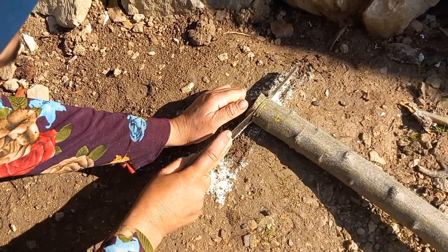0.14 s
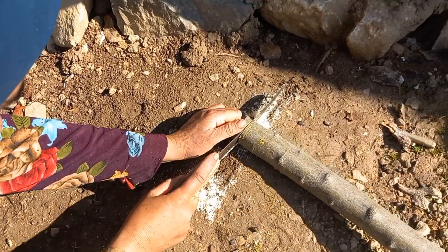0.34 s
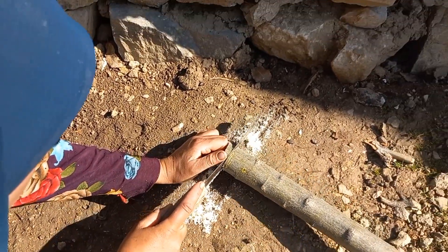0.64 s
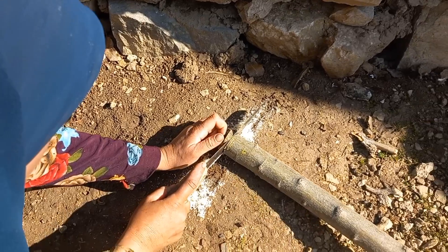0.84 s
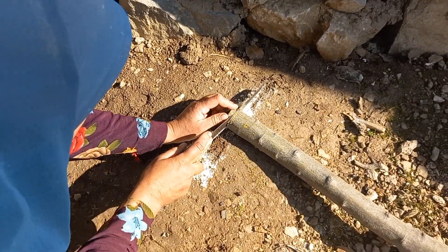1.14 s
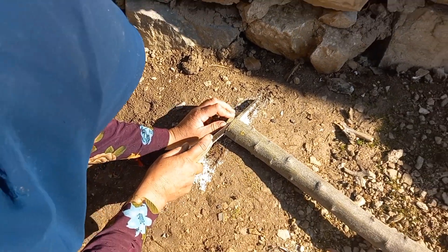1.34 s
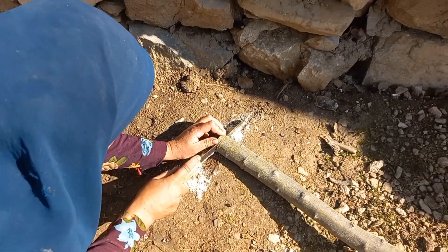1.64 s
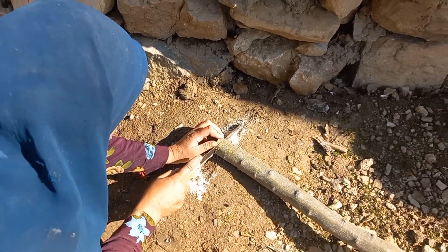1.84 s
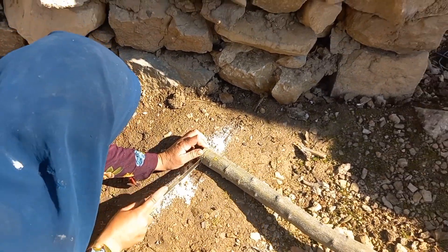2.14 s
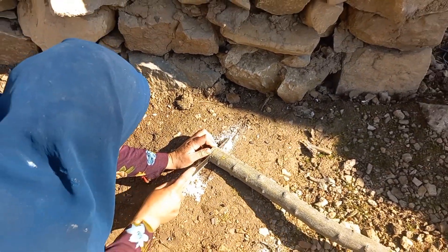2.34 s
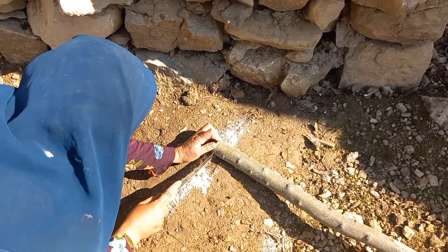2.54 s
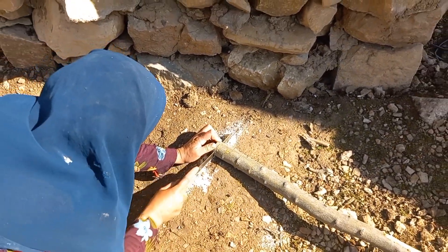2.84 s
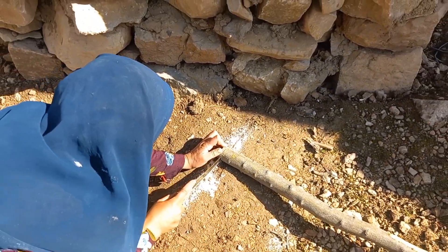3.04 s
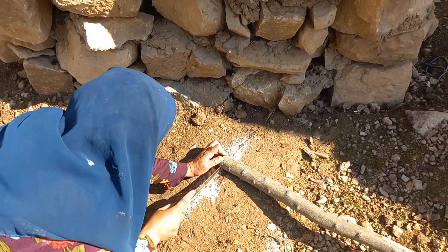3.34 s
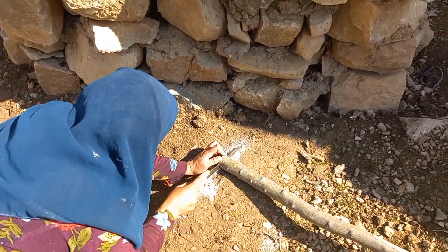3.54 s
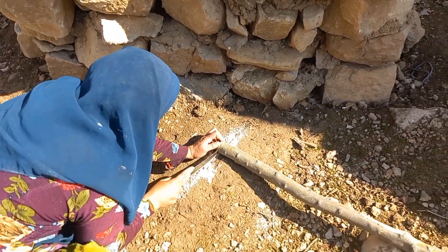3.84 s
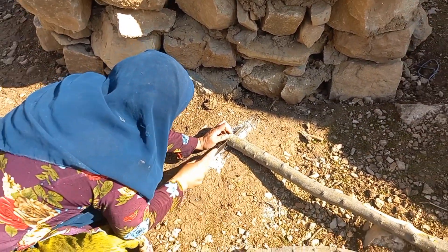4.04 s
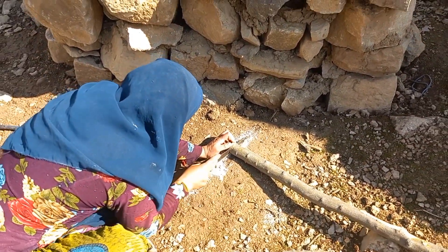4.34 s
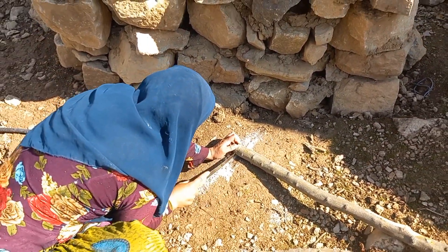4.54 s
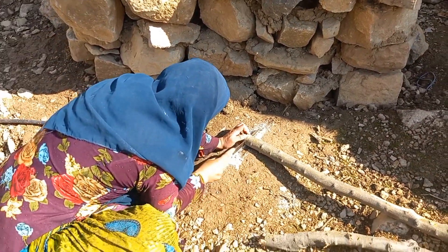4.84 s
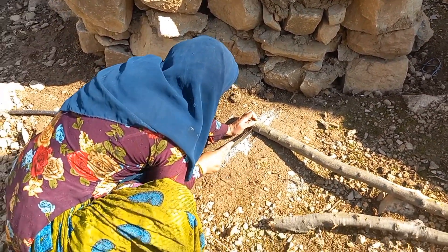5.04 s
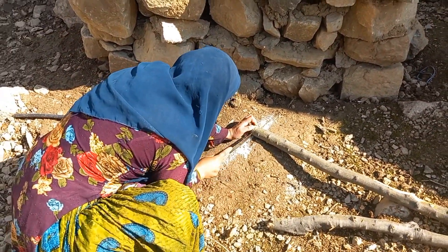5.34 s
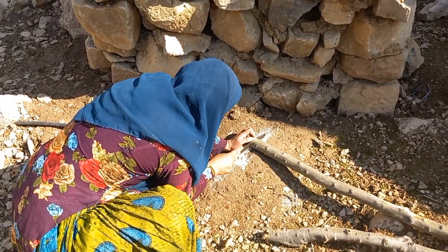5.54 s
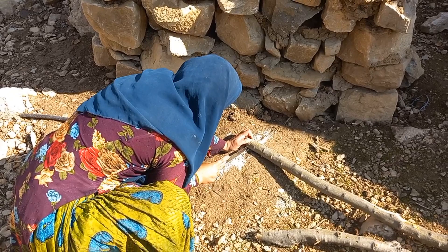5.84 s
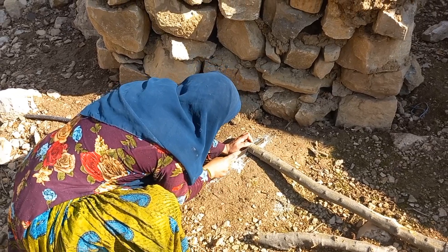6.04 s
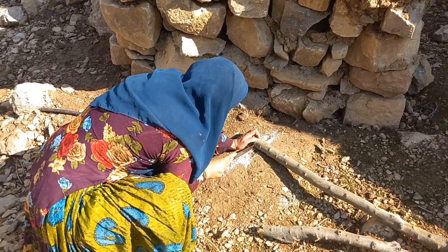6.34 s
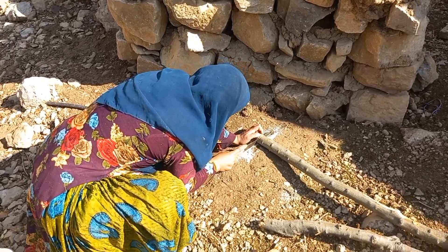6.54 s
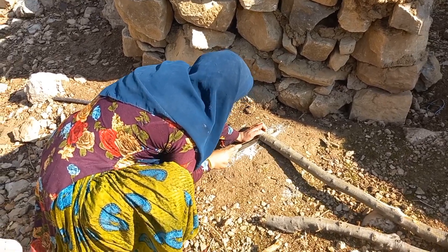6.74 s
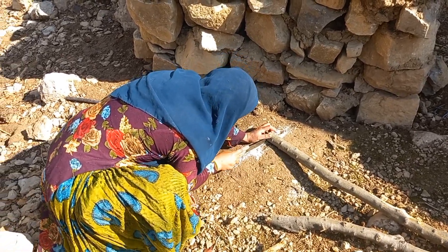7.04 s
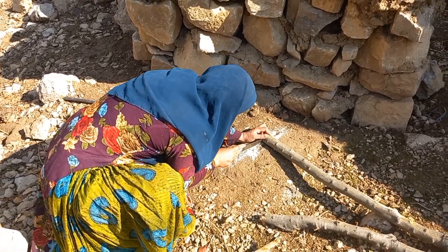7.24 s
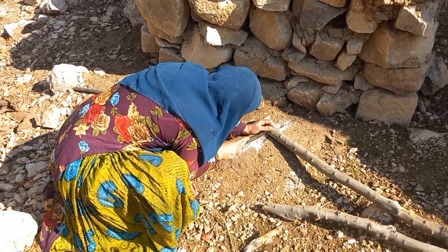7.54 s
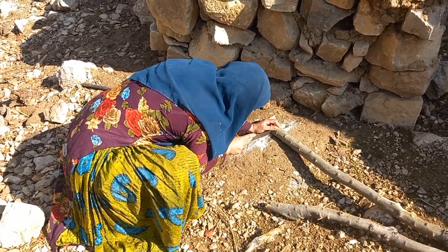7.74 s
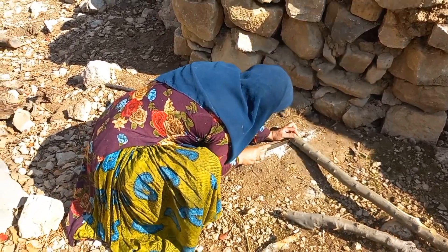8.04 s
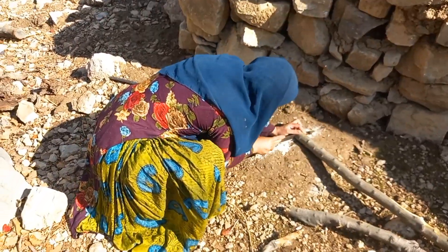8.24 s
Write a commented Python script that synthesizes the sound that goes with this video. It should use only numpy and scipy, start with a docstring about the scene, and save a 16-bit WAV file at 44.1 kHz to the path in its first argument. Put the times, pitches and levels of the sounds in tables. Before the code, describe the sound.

Stony ground outdoors, close stereo microphone. Soft airy hiss with a faint wooden creak and a few ticks comes first. Then a small hand saw cuts a branch in quick even strokes, bright rasps alternating with lighter returns that make the wood drone low. One hard tooth catch snaps out midway. The strokes weaken and stop; after a pause with cloth rustle and clicks, two more cuts follow.

```python
"""Stony ground outdoors: close to a two-port microphone, a small hand saw cuts a thin branch.
Pulled and pushed about five strokes a second with pauses, its teeth tear grains of noise from the fibres.
The blade rings as resonant bands; gliding teeth make the branch drone at their passing rate.
Short noise bursts are ticks, scuffs and a hard catch of the teeth, soft hiss is cloth and open air,
and lumpy low noise is wind thumping on one port or the other."""
import sys
import numpy as np
from scipy import signal
from scipy.io import wavfile
from scipy.ndimage import uniform_filter1d

SR = 44100
rng = np.random.default_rng(int(sys.argv[2]) if len(sys.argv) > 2 else 0)


def store_wav(level_fs):
    """Save 16-bit WAV to argv[1]."""
    pcm = np.round(np.clip(np.atleast_2d(level_fs), -1, 1) * 32767)
    wavfile.write(sys.argv[1], SR, pcm.T.astype(np.int16))


def decibels_to_gain(level_db):
    """Convert a level in decibels to a linear amplitude gain (20 dB per decade)."""
    exponent = np.asarray(level_db, float) / 20
    return 10 ** exponent


N = 369999

# Cutting strokes: start_s, length_s, high_rasp_db, wood_over_rasp_db, branch_shake_over_rasp_db
CUT_STROKES = [(2.056, 0.14, -38.5, -6, 2.5), (2.438, .16, -36, -10, -3.5), (2.825, .16, -34.5, -6.5, -6),
               (3.212, .16, -37.5, -6.5, -6.5), (3.63, 0.15, -36.5, -7.5, -5.5), (4.044, 0.16, -37, -7, -7),
               (4.44, 0.17, -37.5, -11.5, -5), (4.835, 0.16, -37.5, -7.5, -6.5),
               (5.246, 0.15, -38, -7.5, -14), (5.646, 0.16, -40.5, -6, -7.5),
               (6.108, 0.16, -44, -4.5, -7.5), (6.54, 0.16, -46, -2.5, 2.5), (7.958, 0.16, -45.5, -2, 2),
               (8.348, .16, -40, -5, 2)]
# Return strokes gliding over the cut: end_s, length_s, high_rasp_db, fastest_teeth_hz, drone_db
GLIDE_STROKES = [(2.444, 0.19, -46, 193.6, -34.5), (2.828, .2, -45, 201, -30.5),
                 (3.217, .19, -42.5, 222.6, -33), (3.627, 0.18, -43.5, 203.2, -31.5),
                 (4.043, .21, -44, 214.4, -34), (4.442, .2, -43.5, 213, -34.5),
                 (4.829, 0.2, -42, 217.6, -39), (5.237, 0.19, -41.5, 214.6, -42.5),
                 (5.634, 0.18, -43, 185.7, -65), (6.097, .18, -46, 184.2, -42),
                 (6.536, .17, -44.5, 175.3, -44), (7.932, 0.14, -52, 171.2, -48),
                 (8.337, 0.16, -48.5, 185.7, -39.5)]
# Bending mode of the branch: centre_hz, width_hz
BENDING_MODE = (164.3, 22)
FASTEST_S = 0.068  # teeth pass fastest this long before the end of a return stroke


def evened(x):
    """Scales so that the mean of the channels has rms 1."""
    return x / np.sqrt(np.mean(np.atleast_2d(x).mean(0) ** 2) + 1e-20)


def read(points, hz):
    """A spectrum read on a log-frequency axis."""
    f, value = np.transpose(points)
    return np.interp(np.log(hz + 1), np.log(f + 1), value)


def band(x, lo_hz, hi_hz):
    """Steep band-pass."""
    return signal.sosfilt(signal.butter(3, [lo_hz, hi_hz], "bandpass", fs=SR, output="sos"), x)


def curve(points, start=0., length=1.):
    """A curve laid over a span of time, one value a sample."""
    return np.interp((np.arange(N) / SR - start) / length, *np.transpose(points))


def swell(shape, start, length, db):
    """Gain of one stroke, fading to -150 dB just outside its shape."""
    before, after = (shape[0][0] - 0.05, -150), (shape[-1][0] + 0.05, -150)
    return decibels_to_gain(db + curve([before, *shape, after], start, length))


def drifting(shape, bins, frames):
    """Smooth random field over frequency and time, standard deviation 1."""
    field = rng.standard_normal(shape[::-1]).T
    for _ in range(2):
        field = uniform_filter1d(field, size=bins, axis=0)
        field = uniform_filter1d(field, size=frames, axis=1)
    return field / field.std()


def at_ports(envelope, colour_db, patchy_db, turn_rad):
    """Spectra of coloured noise at two ports, partly alike, with a drifting phase gap between them."""
    # How alike the ports sound: frequency_hz, likeness (0 to 1)
    likeness = [(150, 0.37), (500, 1), (1000, 0.59), (4000, 1), (8000, 0.77), (15000, .4)]
    # Balance of the ports: frequency_hz, left_over_right_db
    port_balance = [(60, 5.5), (150, -0.5), (380, -1), (950, 4.5), (2380, 4), (5980, -6), (15000, 0.5)]
    noise = rng.standard_normal((2, N)) * envelope
    hz, t, (a, b) = signal.stft(noise, SR, nperseg=1024, noverlap=768)
    same = np.clip(read(likeness, hz), 0, 1)[:, None]
    widening = np.minimum(hz / 1200, 1)[:, None] ** 2  # the lows stay nearly in phase
    gap_rad = turn_rad * widening * drifting(a.shape, bins=10, frames=30)
    z = np.array([a, same * a * np.exp(1j * gap_rad) + np.sqrt(1 - same ** 2) * b])
    lean_db = read(port_balance, hz)[:, None] / 2
    patches_db = patchy_db * drifting(a.shape, bins=5, frames=7)
    z *= decibels_to_gain(colour_db(hz[:, None], t) + patches_db + [lean_db, -lean_db])
    return hz, z


def sound(z):
    """Short-time spectra back to samples."""
    return signal.istft(z, nperseg=1024, noverlap=768)[1][:, :N]


def rasp(turns, high_gain, bite_gain, wood_gain):
    """Fibres tear in dense grains; a deep bite adds the middle band, a loose branch the woody band."""
    tears = decibels_to_gain(1.8 * np.minimum(rng.exponential(1, N), 4)) * (rng.random(N) < 3000 / SR)
    grains = signal.lfilter([1], [1, -np.exp(-1 / (0.0014 * SR))], tears)  # each decays in 1.4 ms
    tooth_lift = 1 + 0.1 * np.cos(2 * np.pi * turns)  # each tooth lifts the rasp a little
    grains = (0.7 + grains / grains.mean()) * tooth_lift
    hz, z = at_ports(grains, rasp_colour, patchy_db=1.4, turn_rad=2.2)
    part = np.digitize(hz, [1000, 3000])[:, None]
    wood, bite, high = (evened(sound(z * (part == k))) for k in range(3))
    # the hardest bites bind and screech
    jam_gain = np.clip((20 * np.log10(high_gain) + 37.6) / 6, 0, 1.2)
    jam = jam_gain * band(high + bite, 2630, 4970)
    return high_gain * (high + jam) + bite_gain * bite + wood_gain * wood


def rasp_colour(hz, t):
    """Smooth rasp, rings that fade as the cut deepens, and a blade ring that slides with the free length."""
    # Smooth spectrum of tearing fibres: frequency_hz, relative_level_db (per Hz)
    fibre_spectrum = [(150, -16.5), (270, -3.5), (350, -5), (800, -7.5), (1710, -4.5), (4150, -7.5),
                      (5010, -9), (6500, -6.5), (8000, -9.5), (9000, -18), (13500, -10), (15300, -17),
                      (15900, -55.5)]
    # Rings of blade and wood above the rasp, before they vary and fade: centre_hz, width_hz, height_db
    ring_table = [(517, 140, 8), (688, 30, 5), (1290, 180, 2), (2150, 170, 7.5), (2510, 110, 4),
                  (3100, 50, 4), (4270, 440, 4.5)]
    # Ring of the free blade end: mid_stroke_hz, glide_hz_per_s, width_hz, height_db
    blade_end = (7130, 13300, 1800, 3.75)

    def bump(centre_hz, width_hz, db):
        return db / (1 + (2 * (hz - centre_hz) / width_hz) ** 2)

    middles = [(s + d / 2, 1) for s, d, *_ in CUT_STROKES]
    middles += [(s - FASTEST_S, -1) for s, *_ in GLIDE_STROKES]
    middle, way = np.transpose(middles)
    stroke = abs(t[:, None] - middle).argmin(axis=1)
    travel_s = way[stroke] * np.clip(t - middle[stroke], -0.08, 0.08)
    # each stroke bends the blade a little differently
    draws = rng.uniform(-0.39, 1, (len(middle), 2, len(ring_table)))
    strong, shift = draws[stroke].transpose(1, 2, 0)
    rings = sum(bump(f * (1 + 0.015 * b), width, db * (1 + 0.25 * a))
                for (f, width, db), a, b in zip(ring_table, strong, shift))
    rings = rings * np.clip(1.5 - t / 6, 0, 1)  # whole until 3 s, then fading
    centre_hz, glide, width_hz, blade_db = blade_end
    return read(fibre_spectrum, hz) + rings + bump(centre_hz - glide * travel_s, width_hz, blade_db)


def cut_shape(db):
    """The swell of a stroke of this strength; light ones run flatter."""
    # Swell and decay: share_of_length, hard_stroke_db, light_stroke_db (both relative to stroke level)
    cut_swell = [(-.05, -44, -44), (0, -35.5, -24.5), (.1, -15, -20), (.2, -7, -5.5), (.35, -1.5, -2.5),
                 (.6, -1, -0.5), (.78, -3, -1), (.9, -13, -12.5), (1, -28, -27.5), (1.251, -42.5, -32)]
    hard_level_db, light_level_db = -34, -49
    light = np.clip((db - hard_level_db) / (light_level_db - hard_level_db), 0, 1)
    return [(share, hard_db + light * (light_db - hard_db)) for share, hard_db, light_db in cut_swell]


def strokes():
    """Power-sums all strokes into gains of the high, middle and woody rasp and of the branch shaking."""
    # Short scrapes and low branch thumps between and beside the strokes:
    # start_s, length_s, high_rasp_db, branch_shake_over_rasp_db
    scrape_table = [(-.03, 0.064, -67.5, 10), (0.069, 0.023, -81.5, 20.5), (0.103, 0.018, -83, 20),
                    (1.51, 0.038, -52.5, -3), (2.026, 0.026, -52, 3.5), (2.183, 0.15, -65.5, 15.5),
                    (4.577, 0.12, -55.5, 1), (5.61, 0.0516, -64, 19), (5.793, 0.074, -71, 19),
                    (6.426, 0.055, -46, 5.5), (7.77, 0.049, -57.5, 3.5), (7.824, 0.055, -48, 7.5),
                    (8.281, 0.047, -45.5, 5)]
    # Teeth catching hard in mid cut: time_s, extra_db
    bind_table = [(2.503, 5), (4.503, 5.5), (5.301, 4)]
    # Swell of a return stroke: share_of_length, level_under_peak_db
    glide_swell = [(-.15, -50), (0, -25), (.25, -10), (.5, -2), (.75, -1.5), (.87, -5), (1, -27),
                   (1.05, -43)]
    # How freely the branch chatters on a return: time_s, wood_over_rasp_db
    chatter = [(2.3, -3.5), (3.2, -6.5), (4, -14), (4.8, -7), (5.6, -10.5), (6.5, -10.5), (8.3, -6.5)]
    bind_rise_s, bind_fall_s = 0.0032, 0.031

    # each row: shape, start_s, length_s, high_db, then bite, wood and shake in dB over the high rasp
    rows = []
    for start, length, db, wood_db, shake_db in CUT_STROKES:
        bite_db = min(-10.5 + 2 * start, 2.5)  # grows as the cut deepens
        rows.append((cut_shape(db), start, length, db, bite_db, wood_db, shake_db))
    for end, length, db, _, _ in GLIDE_STROKES:
        wood_db = np.interp(end, *np.transpose(chatter))
        rows.append((glide_swell, end - length, length, db, -6, wood_db, -2))
    for start, length, db, shake_db in scrape_table:
        rows.append((cut_shape(db), start, length, db, -3.5, -10, shake_db))
    power = sum((swell(*row[:4]) * decibels_to_gain([0, *row[4:]])[:, None]) ** 2 for row in rows)

    t = np.arange(N) / SR
    bind_db = sum(db * np.exp(-((t - s) / np.where(t < s, bind_rise_s, bind_fall_s)) ** 2)
                  for s, db in bind_table)
    uneven_db = 0.63 * evened(band(rng.standard_normal(N), 11, 79))  # the hand presses unevenly
    return np.sqrt(power) * decibels_to_gain(bind_db + uneven_db)


def drone():
    """Gliding teeth push the branch evenly at their passing rate, which arches with the speed of the arm."""
    # Swell of the drone: offset_from_turn (in units of 0.92 s), level_under_peak_db
    drone_swell = [(-.17, -36), (-.13, -14.5), (-.105, -2.5), (-.06, -4), (-.03, -3), (-.005, -12),
                   (.03, -19), (.05, -44)]
    # Brief dips in the drone: middle_s, length_s, dip_db
    dip_table = [(2.385, 0.014, -14), (2.42, 0.024, -4), (2.739, .015, -5), (2.777, .02, -1),
                 (3.14, 0.046, -14), (3.516, 0.048, -13), (3.61, 0.019, -10), (4.001, 0.035, -2.5),
                 (4.354, .04, -8.5), (4.426, 0.03, -10), (4.703, .04, -11), (5.126, 0.063, -8),
                 (6.02, 0.029, -15), (6.473, 0.037, -10), (7.88, 0.032, -12), (8.296, 0.013, -12)]
    slowing_hz_per_s2, slowest_hz = 12000, 117  # before the wander below

    t = np.arange(N) / SR
    end, _, _, top_hz, _ = np.transpose(GLIDE_STROKES)
    fastest = end - FASTEST_S
    stroke = np.searchsorted((fastest[1:] + fastest[:-1]) / 2, t)
    teeth_hz = top_hz[stroke] - slowing_hz_per_s2 * (t - fastest[stroke]) ** 2
    teeth_hz = np.maximum(teeth_hz, slowest_hz)
    wander = 1 + 0.03 * evened(band(rng.standard_normal(N), 11.4, 42.0))
    turns = np.cumsum(teeth_hz * wander) / SR  # teeth passed so far

    push = np.sqrt(2) * (np.cos(2 * np.pi * turns) + 0.065 * np.cos(2 * 2 * np.pi * turns))
    push *= sum(swell(drone_swell, s, 0.92, db) for s, _, _, _, db in GLIDE_STROKES)
    dips_db = sum(db * np.exp(-(2 * (t - s) / d) ** 2) for s, d, db in dip_table)
    flutter_db = 2 * evened(band(rng.standard_normal(N), 10, 47))
    push *= decibels_to_gain(dips_db + flutter_db)
    # the drone swells where the teeth meet the bending mode
    hz, width_hz = BENDING_MODE
    return turns, push + signal.lfilter(*signal.iirpeak(hz, hz / width_hz, SR), push)


def shake(gain):
    """Biting teeth shake the branch at random; its bending mode rings on after the stroke."""
    hz, width_hz = BENDING_MODE
    ring = signal.iirpeak(hz, hz / width_hz, SR)
    jolts = band(rng.standard_normal(N), 87, 388)
    jolts = jolts * gain / signal.lfilter(*ring, jolts).std()
    return signal.lfilter(*ring, jolts) + 0.029 * jolts


def ticks():
    """Sudden noise bursts die away exponentially, bright with a duller low part."""
    # Ticks, short scuffs and a hard catch of the teeth:
    # start_s, peak_db, low_part_db (relative, before a common 3.5 dB lift), t60_s
    tick_table = [(0.2576, -47, -7, 0.062), (0.415, -43, -15, 0.027), (1.3397, -29, -14, 0.0062),
                  (2.2453, -26.5, 1.5, 0.0047), (4.5016, -12.5, -26, 0.03), (5.9305, -38, -25, 0.025),
                  (6.344, -39.5, -8, 0.037), (6.8252, -37.5, -11, 0.064), (7.659, -52, 5, 0.24),
                  (7.7245, -41.5, -15, 0.036), (7.772, -22.5, -17.5, 0.026), (7.835, -27.5, -24, 0.023),
                  (7.8407, -34, -19, 0.04)]
    t = np.arange(4000) / SR
    bright, dull = np.zeros((2, N + len(t)))
    for start, peak_db, low_db, t60 in tick_table:
        at = round(start * SR)
        # noise peaks stand about 12.5 dB over its rms; the burst rises in 0.79 ms
        fall = decibels_to_gain(peak_db - 12.5 - 60 * t / t60) * np.minimum(t / 0.00079, 1)
        bright[at:at + len(t)] += fall
        dull[at:at + len(t)] += fall * decibels_to_gain(low_db + 3.5)
    hiss = rng.standard_normal((2, N)) + 0.5 * rng.standard_normal(N)  # partly shared by the ports
    return bright[:N] * evened(band(hiss, 3400, 8000)) + dull[:N] * evened(band(hiss, 220, 4500))


def creak():
    """The branch shifts on the ground: quick uneven slips ring a short wooden note."""
    # Swell of the creak: after_start_s, relative_level_db
    creak_swell = [(0, -26), (.006, -2.5), (.07, 2), (.15, -12)]
    start_s, level_db = 0.23, -62.5
    sounding = abs(np.arange(N) / SR - start_s - 0.08) < 0.08
    gain = decibels_to_gain(level_db + curve(creak_swell, start_s)) * sounding
    slips = rng.standard_normal(N) * (rng.random(N) < 1500 / SR)
    return gain * evened(signal.lfilter(*signal.iirpeak(850, 2.5, SR), band(slips, 290, 2100)))


def wall(x):
    """A short scatter of echoes from the stones nearby: sparse random taps under a 42 ms decay."""
    t = np.arange(5000) / SR
    taps = rng.standard_normal((2, len(t))) * (rng.random((2, len(t))) < 0.05)
    taps = taps * decibels_to_gain(-60 * t / 0.042) * (t > 0.003)
    return signal.oaconvolve(x, taps / np.linalg.norm(taps, axis=1, keepdims=True), axes=1)[:, :N]


def swish():
    """A thin swish of cloth as the arm reaches back: high airy noise, unrelated at the two ports."""
    # Swell of the swish: time_s, level_db
    swish_level = [(7.15, -96), (7.3, -86.5), (7.45, -76.5), (7.75, -85), (7.8, -97)]
    return decibels_to_gain(curve(swish_level)) * evened(band(rng.standard_normal((N, 2)).T, 9300, 11800))


def rustle():
    """A soft hiss that swells when the cloth moves; the low air follows only a little."""
    # Cloth and open air: time_s, level_db
    rustle_level = [(0, -72.5), (.3, -72.5), (.9, -66.5), (2, -67.5), (6.75, -72), (7.2, -76.5),
                    (7.5, -65.5), (7.76, -69.5)]
    # Spectrum of the hiss: frequency_hz, relative_level_db (per Hz)
    air_spectrum = [(40, -28), (80, 5), (270, -3), (560, -9.5), (1400, -11.5), (7500, -7.5), (9000, -21.5),
                    (10800, -20.5), (15200, -22), (15900, -46.5)]
    hz, z = at_ports(1, lambda hz, t: read(air_spectrum, hz), patchy_db=-0.2, turn_rad=2.05)
    low = sound(z * (hz < 700)[:, None])
    full = sound(z)
    db = curve(rustle_level)
    low_db = 0.24 * (db + 81) - 72.0
    return (decibels_to_gain(db) * (full - low) + decibels_to_gain(low_db) * low) / full.mean(0).std()


def wind():
    """Lumpy low pressure, unrelated at the two ports; each puff is a bell-shaped swell."""
    # Puffs of wind: middle_s, length_s (between points 6.3 dB down), level_db, left_over_right_db
    gust_table = [(0.543, 0.9, -80, 13), (0.87, 0.035, -44.5, -34), (0.895, 0.063, -52, -30),
                  (1.482, 0.036, -51, -30), (1.536, 0.054, -56, -12), (3.63, 0.17, -50.5, -11),
                  (3.85, 0.38, -45, 16), (4.052, 0.1, -32, -22), (4.174, 0.052, -31, -14),
                  (4.319, 0.23, -46.5, 22)]
    t, power = np.arange(N) / SR, 0
    for middle, length, db, left_db in gust_table:
        left_share = 1 / (1 + decibels_to_gain(-left_db) ** 2)
        shares = np.array([[left_share], [1 - left_share]])
        bell = decibels_to_gain(db - 6.3 * (2 * (t - middle) / length) ** 2)
        power = power + 2 * shares * bell ** 2
    lumps = decibels_to_gain(5 * evened(band(rng.standard_normal((N, 2)).T, 3.7, 20.9)) / np.sqrt(2))
    return np.sqrt(power) * evened(band(rng.standard_normal((N, 2)).T, 65, 146.5) * lumps)


def scene():
    """Saw, branch and small sounds with their echoes, then air and wind."""
    turns, hum = drone()
    *rasp_gains, shake_gain = strokes()
    near = rasp(turns, *rasp_gains) + ticks() + creak()
    branch = (hum + shake(shake_gain)) * decibels_to_gain([[-0.7], [0.7]])  # leans to the right port
    air = rustle() + swish() + wind()
    # the port cuts deep bass
    air = signal.sosfilt(signal.butter(3, 62, "highpass", fs=SR, output="sos"), air)
    return near + decibels_to_gain(-10.0) * wall(near) + branch + air


def low_pass(x):
    """Removes everything above the highest recorded frequency."""
    return signal.sosfilt(signal.butter(12, 16450, fs=SR, output="sos"), x)


def record(dry):
    """Takes the two port signals as the finished mix."""
    return low_pass(dry)


dry = scene()
out = record(dry)
store_wav(out)
```